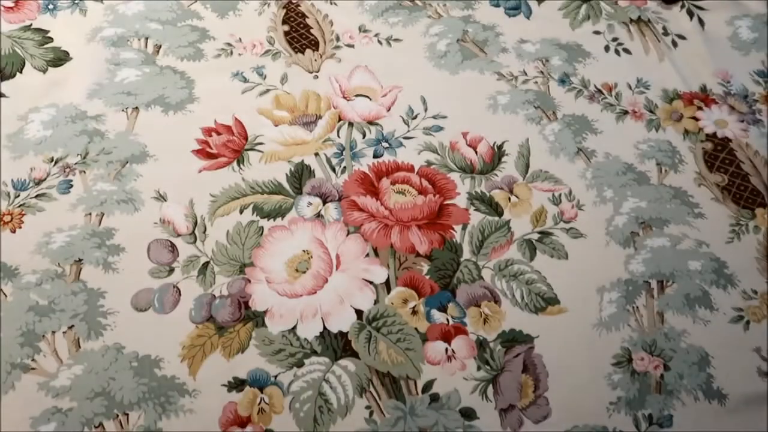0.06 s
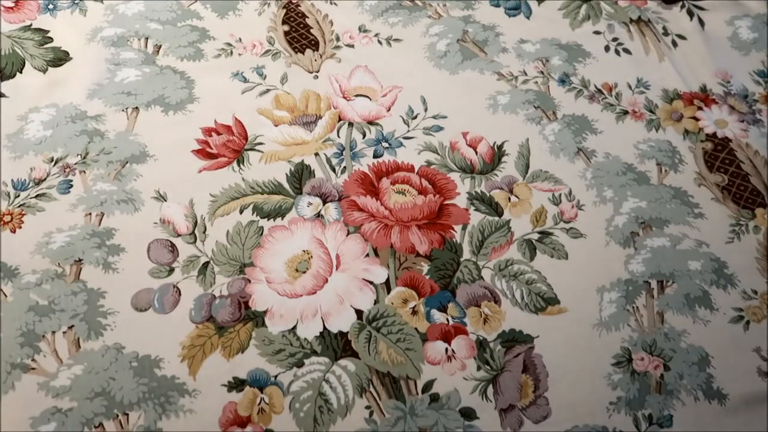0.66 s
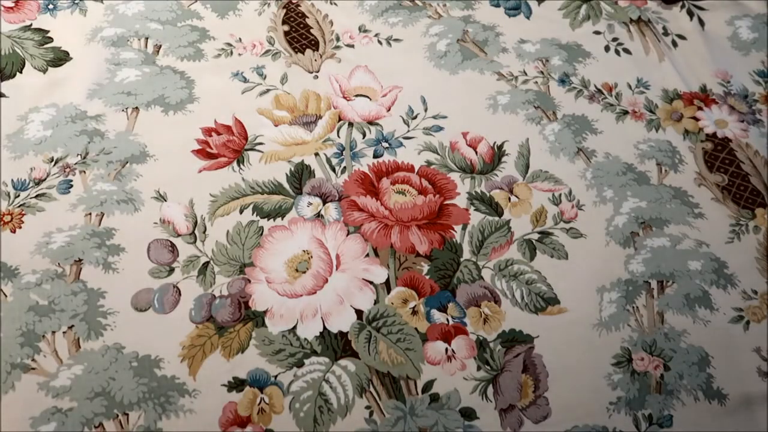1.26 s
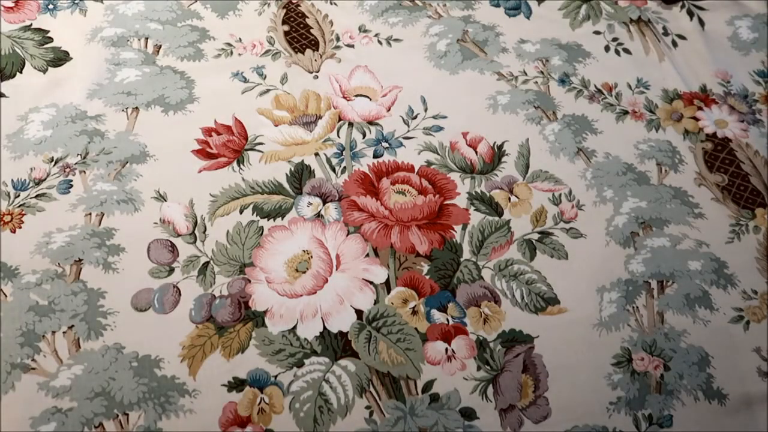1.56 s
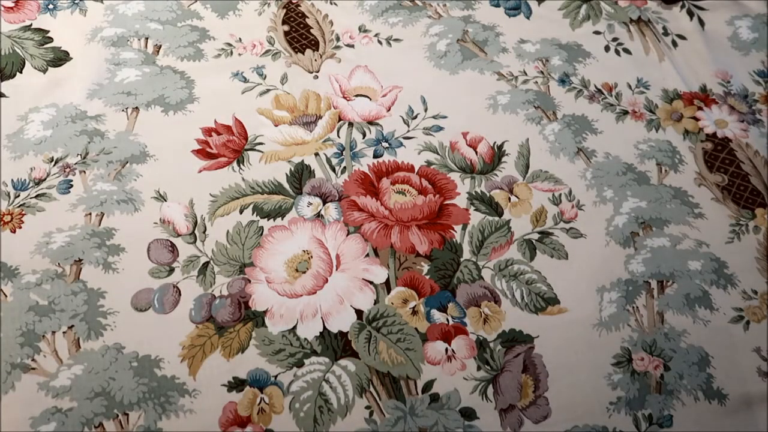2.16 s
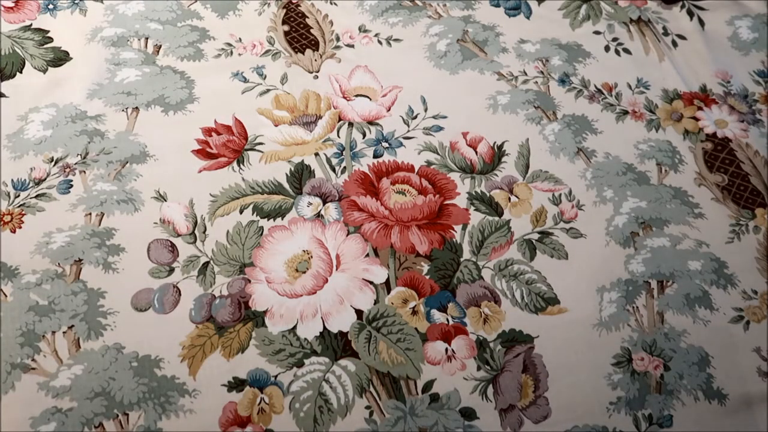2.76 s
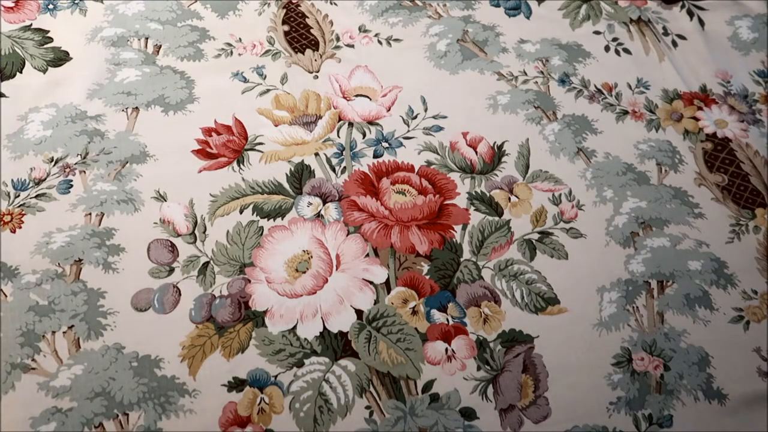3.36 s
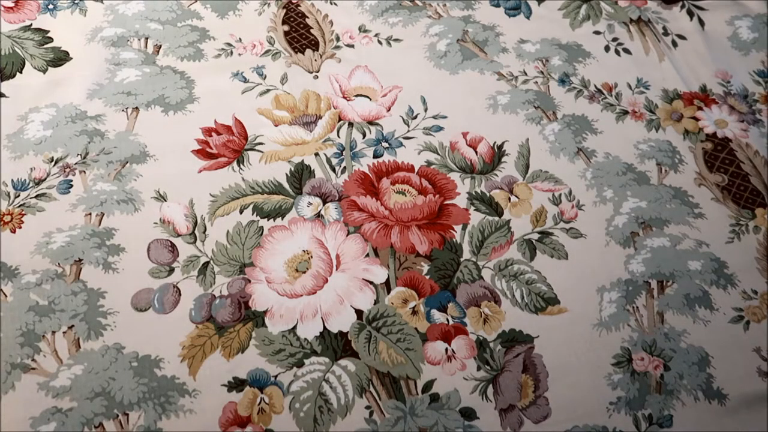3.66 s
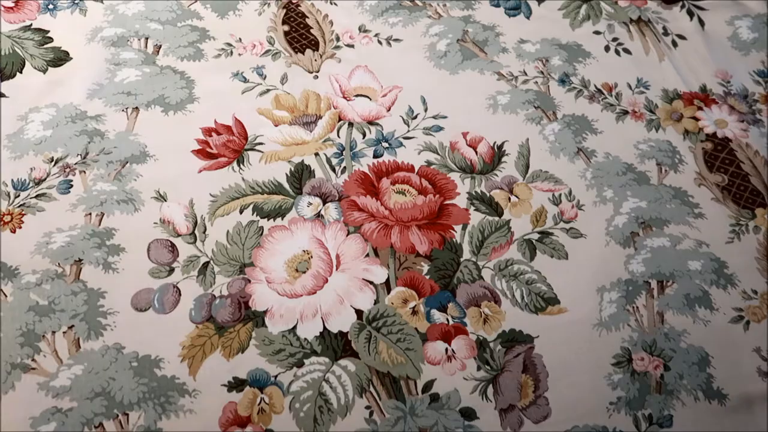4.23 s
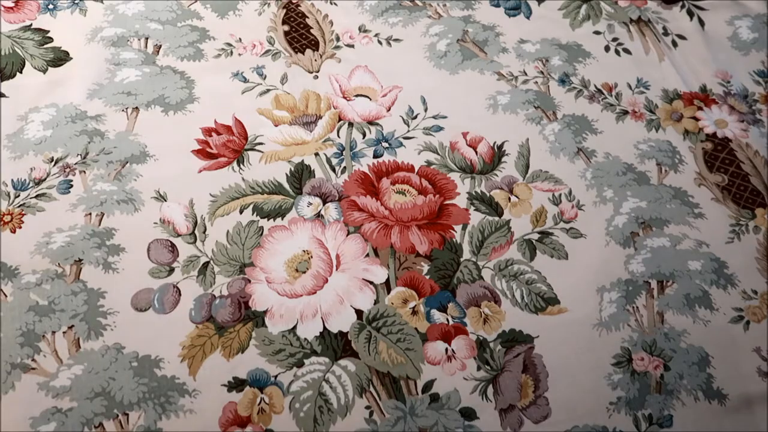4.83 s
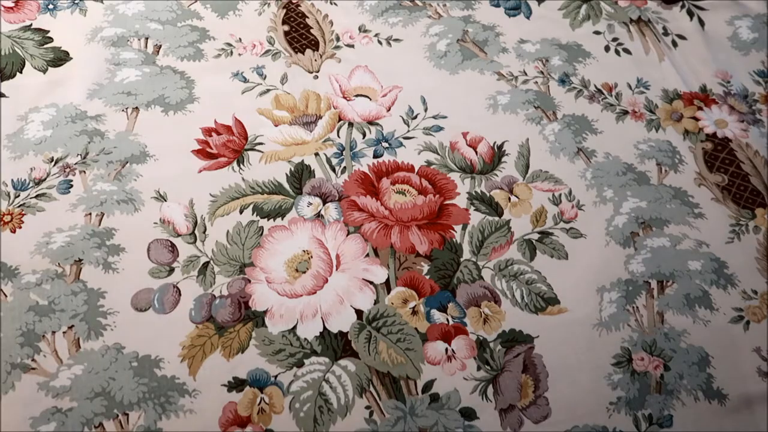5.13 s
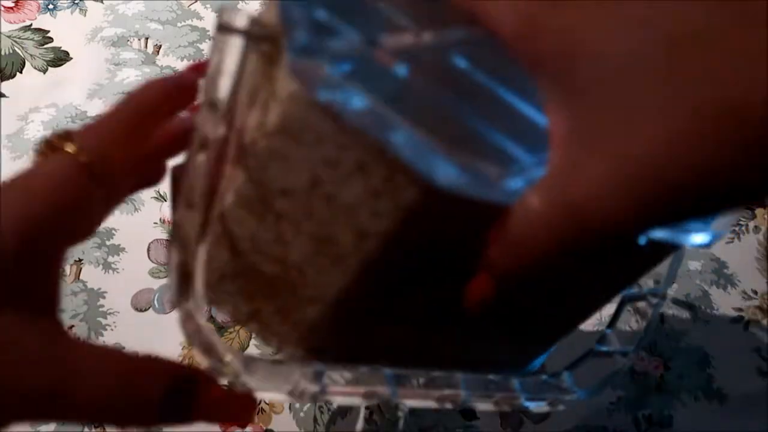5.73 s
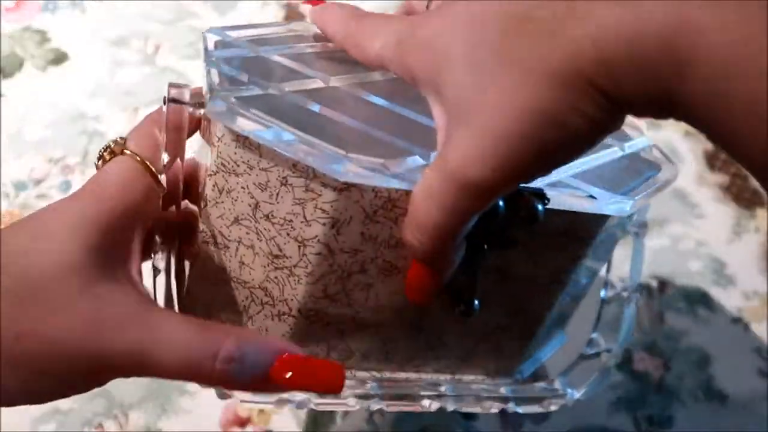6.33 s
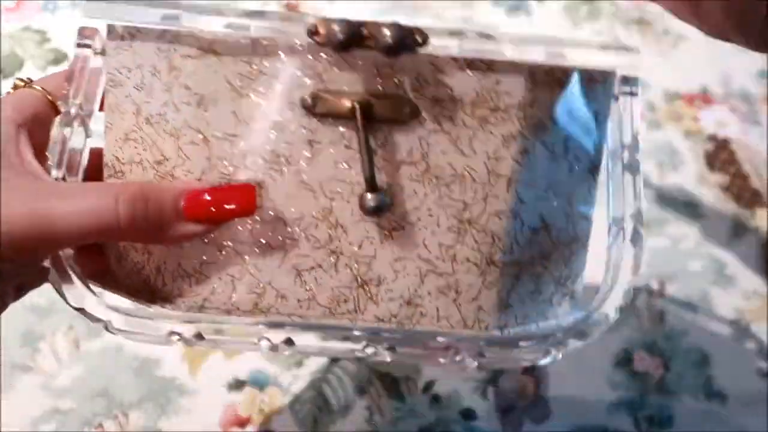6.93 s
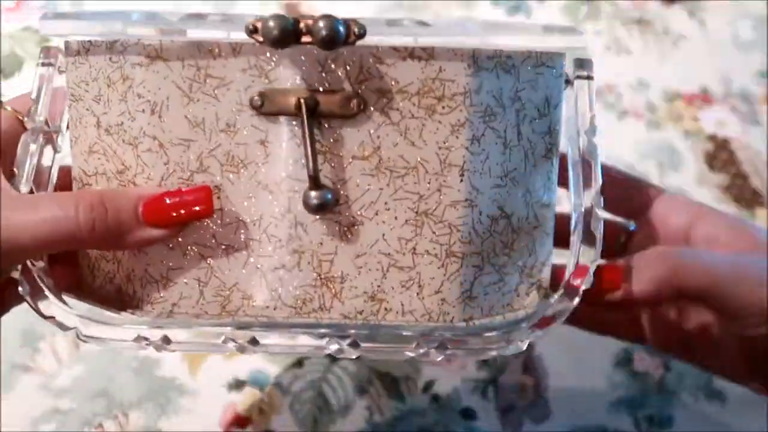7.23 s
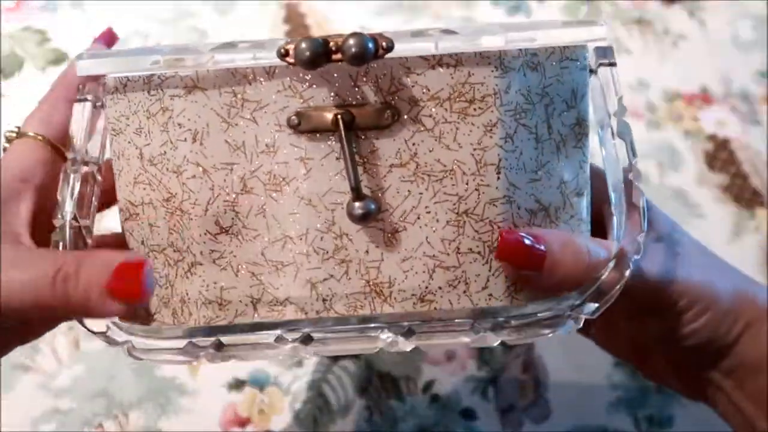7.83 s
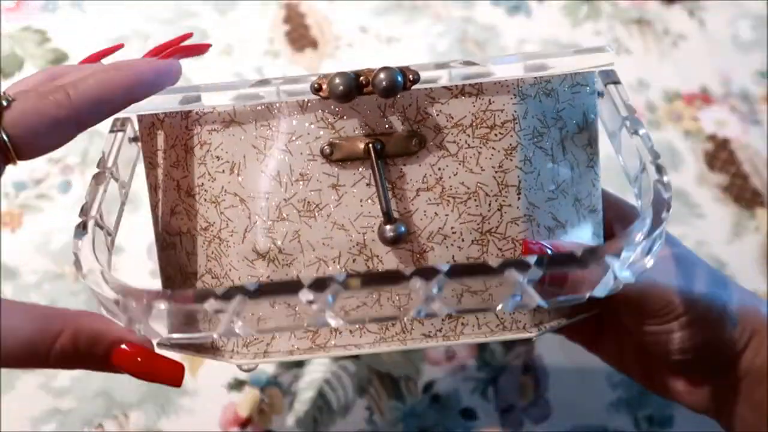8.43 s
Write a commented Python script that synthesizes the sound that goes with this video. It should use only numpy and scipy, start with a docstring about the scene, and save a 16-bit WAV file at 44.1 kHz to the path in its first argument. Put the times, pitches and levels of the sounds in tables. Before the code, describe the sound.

A hard plastic box purse is handled in a quiet room, over low room air and a faint electrical hum. At first it is about half a metre from the stereo microphone, knocking on a table with a short room echo. Hollow clacks come at about 0.4 and 0.9 seconds, with soft sliding between. A light knock at 1.6 leads to a quick clatter, loudest near 2.3 seconds. More knocks follow around 2.9 and 3.2, then faint slides and a few duller bumps near 4.7. After a pause, the purse is turned in the hands close to the microphone and sounds drier. From 5.7 to 6.1 seconds the loose handle raps on the hollow shell amid small clicks. Lighter taps and soft hand rubbing follow, with clasp and fingernail clicks near 6.5 and 7.4, and a quick run of light taps from 7.8 to 8 seconds.

```python
"""A hard plastic box purse, handled in front of a stereo microphone in a quiet room.
First it is knocked about and slid on a table some half a metre off, and the room answers each blow.
Then it is turned in the hands about 20 cm from the microphone: the loose handle raps on the hollow
shell, clasp and fingernails click, hands rub. Each contact is a brief crack plus the ringing of the
body's modes. Room air and a faint mains hum lie underneath."""
import sys
import numpy as np
from scipy import signal
from scipy.fft import rfft, irfft
from scipy.io import wavfile
from scipy.ndimage import uniform_filter1d

SR = 44100
rng = np.random.default_rng(int(sys.argv[2]) if len(sys.argv) > 2 else 0)


def digitize_waveform(pressure):
    """Quantize a signal to 16-bit integers and store it at the path in sys.argv[1].

    Rows of a 2-D input are taken as channels; values are limited to [-1, 1].
    """
    field = np.atleast_2d(pressure).T
    bounded = np.clip(field, -1, 1)
    quanta = np.round(bounded * 32767).astype(np.int16)
    wavfile.write(sys.argv[1], SR, quanta)


N = 374409

# Spectrum of the room's air. Each row: frequency in Hz, relative density in dB.
AIR_SPECTRUM = [(13, -51.5), (22, -24), (59, 0), (92, -13), (124, -5.5), (146, -13), (187, -4), (382, -11),
                (438, -10.5), (502, -17.5), (698, -17), (779, -19), (6100, -33.5), (13500, -44.5),
                (15500, -50)]
# Stereo image of the air. Each row: frequency in Hz, left-right correlation.
AIR_LIKENESS = [(60, 1), (130, 0.97), (290, 0.8), (640, 0.36), (1410, 0.056), (3100, 0.0066), (6820, -0.24),
                (15000, -0.051)]
# Lines of the mains hum. Each row: frequency in Hz, level in dB.
HUM_LINES = [(59.3, -60), (118.6, -59.5), (177.9, -78.5), (441, -65.5), (1583, -75)]
# Decay of the room. Each row: frequency in Hz, seconds to fall 60 dB (t60).
ROOM_T60 = [(150, 0.36), (500, 0.27), (1400, 0.38), (4000, 0.31), (8000, 0.3), (14000, 0.26)]
# Stereo image of the reflections. Each row: frequency in Hz, left-right correlation.
ROOM_LIKENESS = [(150, 0.98), (700, 1), (1500, 1), (3000, 0.9), (7000, 0.68), (14000, 0.13)]
# Where the purse is. Each row: time in seconds, midrange left minus right in dB, distance in metres.
PURSE_PATH = [(0.3, 1.5, 0.55), (3.2, 2, 0.48), (4.7, -5.5, 0.4), (4.9, 5, 0.026), (5.7, 0.63, 0.2),
              (8.4, 0.1, .22)]
# Borders in Hz of a contact's four registers: thump, knock, clack and tick.
REGISTER_EDGES_HZ = [130, 420, 1500, 4500, 14000]

# Blows on the table. Each row: start in seconds, strike in dB, hardness in dB per octave, thump in dB,
# room send in dB (less when the struck wall faces the microphone), then three resonances of the
# struck spot, each as frequency in Hz and lift in dB.
TABLE_KNOCKS = [(0.3487, -26, -5, -34, 0, 746, 11, 2780, 9, 3320, 8),
                (0.3522, -21.5, -5, -27.5, 0, 288, 5.1, 528, 18.5, 1340, 10),
                (0.444, -36, -8, -47, -4, 475, 12, 900, 8, 1300, 2),
                (0.501, -30.5, -6, -38, 0, 540, 15.7, 1100, 7, 2320, 6),
                (0.9134, -27, -2, -42, 4.5, 1370, 3, 2800, 7, 4490, 7),
                (0.9166, -24, -3.5, -29.5, -6, 556, 17, 1140, 10, 5300, 6),
                (0.9212, -31.5, -3.5, -29.5, -6, 430, 7.8, 900, 11, 1710, 3),
                (0.9391, -36.5, -2, -55, -7, 1120, 5, 3085, 6, 5400, 9),
                (0.985, -37.5, -8, -39, -0.5, 542, 29, 865, -2, 1120, -1),
                (1.6491, -36, -6.5, -46.5, 4, 550, 8.5, 710, 4, 2240, 0),
                (2.0536, -33, -4.5, -37, 3.5, 829, 6, 1380, 5, 1920, 13),
                (2.081, -35.5, -1.7, -40, 1.5, 1110, 28, 4300, 9, 5870, 13),
                (2.098, -51.5, 2, -53.5, 10, 2210, 4, 4400, 18, 6930, 14),
                (2.124, -37, -4, -35.5, 1.5, 756, 6.1, 1880, 18.5, 4350, 15.5),
                (2.23, -31.5, -5, -34, 4.5, 500, 14, 713, 3, 1110, 0),
                (2.239, -20.5, -4, -37.5, 6, 535, 9.3, 1710, 10, 2420, 2),
                (2.2466, -19, -5, -31.5, -1, 518, 16, 1100, 9, 2450, 8),
                (2.27, -13.5, -3.5, -24, -8, 703, 11.4, 1365, 13.5, 1640, 10),
                (2.2765, -25.5, 0.5, -33.5, 10, 717, 19, 2900, -3, 4900, 5),
                (2.2869, -25, -3.5, -37, 2.5, 740, 6, 3900, 3, 7000, -5),
                (2.818, -54, 0.3, -65, 7, 2900, 8.1, 3660, 16, 5400, 8),
                (2.897, -36.5, -7.5, -41, 1.5, 690, 15, 1090, 13.5, 1410, 9),
                (3.1567, -32, -2.5, -35, 3.5, 523, 7.8, 855, 17, 1710, 11.5),
                (3.163, -26, -10, -27, -4, 255, 17, 640, 16, 1240, 16),
                (3.169, -30, -12, -35, -3.5, 283, 4, 544, 12, 637, 24),
                (4.668, -42.5, -10, -43, 11, 270, 6.3, 556, 15, 720, 24),
                (4.697, -47.5, -18, -32.5, -5, 283, 23, 560, 3, 705, 14),
                (4.7993, -30.5, -9.5, -49, 7.5, 476, 7.9, 720, -1, 1230, 1),
                (4.8232, -28.5, -9.5, -31, 6, 213, 13.5, 577, 14, 766, 20)]
# Modes of the purse on the table. Each row: frequency in Hz, relative level in dB, t60 in seconds.
TABLE_MODES = [(220, 3, 0.015), (277.5, 2, 0.046), (461, -1, 0.038), (520, 0, 0.065), (691, 4.5, 0.032),
               (820, -9, 0.092), (1020, -10, 0.048), (1130, -2.5, 0.042), (1340, 6, 0.018),
               (2240, -2.5, 0.039), (2900, -10, 0.061), (3100, -3, 0.038), (3450, -1.5, 0.029),
               (4430, -8.5, 0.031), (5400, -7.5, 0.022), (6930, -5.5, 0.035), (7620, -8.5, .03)]
# Hands and purse sliding, and soft finger thuds on the shell (the rows near 280 Hz after 5.8 s). Each row:
# start in seconds, length in seconds, centre in Hz, level in dB.
RUB_STROKES = [(0.609, 0.11, 375, -46.5), (0.717, 0.056, 282, -46), (0.771, 0.068, 565, -45.5),
               (0.862, 0.061, 646, -45.5), (2.077, 0.053, 4390, -46.5), (2.161, 0.087, 560, -47),
               (2.989, 0.28, 990, -51.5), (3.428, 0.16, 990, -55.5), (4.009, 0.061, 384, -46.5),
               (5.626, 0.076, 2750, -55.5), (5.865, 0.055, 290, -42.5), (6.042, 0.07, 2900, -55),
               (6.165, 0.068, 262, -48), (6.794, 0.033, 1700, -59), (6.806, 0.054, 300, -48.5),
               (6.906, 0.021, 2600, -59), (7.005, 0.14, 290, -52), (7.127, 0.047, 1390, -59),
               (7.798, 0.13, 1980, -63)]
# Handle and fingers on the shell. Each row: start in seconds, strike in dB, hardness in dB per octave,
# thump in dB, then two resonances of the struck spot, each as frequency in Hz and lift in dB.
SHELL_RAPS = [(5.7559, -37, -8, -48.5, 620, 7.1, 970, 6.8), (5.904, -40.5, -22, -48, 454, 4.1, 1040, 12),
              (6.0089, -26, -7, -35, 1060, 8.9, 2900, 3.5), (6.0436, -27, -7, -27.5, 380, 13, 810, 9),
              (6.0733, -28.5, -9, -31, 1055, 13, 1820, 9.3), (6.09, -35.5, -11, -43, 287, 3.5, 810, 5.1),
              (6.783, -53, -10, -39, 220, 6.3, 420, 2), (6.8033, -45.5, -7, -38.5, 1000, 7, 2110, 6.2),
              (6.958, -43, -7.5, -38.5, 950, 17, 2040, 10), (6.997, -62, -4, -39, 285, 3.4, 1000, 2),
              (7.1291, -51, -6.5, -52, 1020, 13, 1590, 6.3), (7.283, -45.5, -6, -40, 950, 20, 1560, 5.1),
              (7.598, -44, -7, -38.5, 976, 17, 1620, 3.9), (7.629, -52, -14, -42, 1020, 11, 1672, 5),
              (7.809, -58, -10, -47, 638, 4, 920, 7), (7.833, -50.5, -5.5, -45, 1850, 16, 3280, 20),
              (7.878, -50.5, -5.5, -39, 429, 9, 1700, 8.6), (7.921, -45, -7, -40.5, 1000, 5.6, 1650, 14),
              (7.944, -43, -7.5, -40, 990, 5.3, 1665, 10), (7.987, -43, -8, -43, 1020, 12, 1660, 14),
              (8.036, -44, -6.5, -40, 970, 8.6, 1665, 8.5)]
# Modes of the hand-held shell. Each row: frequency in Hz, relative level in dB, t60 in seconds.
SHELL_MODES = [(238, -1, 0.15), (290, 2, 0.11), (430, 2, 0.029), (784, -5, 0.053), (906, 0.5, 0.013),
               (1030, -1, 0.026), (1237, -11, 0.066), (1400, -2, 0.024), (1640, 1, 0.037), (1890, 0, 0.031),
               (2076, -11, 0.091), (2332, -14.5, 0.087), (2830, -5.5, 0.026), (3280, -8.5, 0.021),
               (3780, -11, .018), (4900, -5, 0.014)]
# Clasp and fingernail contacts. Each row reads as in SHELL_RAPS.
CLASP_CLICKS = [(5.845, -47, -1, -43, 2706, 9.9, 9700, 15), (5.8663, -59, 3, -63, 7600, 5.2, 11200, 25),
                (5.874, -47.5, 1, -42, 4550, 14, 5150, 5.5), (6.165, -74.5, 4.5, -46, 11300, 8, 12000, 24),
                (6.465, -47.5, 0.1, -38.5, 1900, 8.3, 5370, 6.7),
                (7.4085, -44, -0.3, -42, 2970, 9.3, 4070, 15),
                (7.4453, -38.5, 0, -46, 1650, 5.7, 2930, 9.7), (7.4498, -42, -2, -51, 476, 14, 1960, 27),
                (7.512, -67, -1.5, -46, 3200, 4, 4300, 8)]
# Modes rung by the clasp. Each row: frequency in Hz, relative level in dB, t60 in seconds.
CLASP_MODES = [(270, -1, 0.08), (468, -2, 0.093), (810, -7, 0.027), (1020, 10.5, 0.014), (1650, 6, 0.016),
               (2067, 3, 0.041), (2720, -5, 0.045), (3320, 5.5, 0.028), (3900, -2, 0.021), (4160, 7, 0.017),
               (4550, 5.5, 0.023), (5150, 9, 0.014), (5350, 0, .017), (7570, 9.5, 0.0082),
               (11000, -22, 0.018)]

RING_TIME = np.arange(20480) / SR  # seconds since a contact
ATTACK_SAMPLES = int(.02 * SR)
REGISTER_CENTRES_HZ = np.sqrt(np.multiply(REGISTER_EDGES_HZ[1:], REGISTER_EDGES_HZ[:-1]))
ROOM_RADIUS_M = 0.34  # here the room is as loud as the direct sound, for a send of 0 dB


def from_db(db):
    """Decibels to gain."""
    return 10 ** (np.asarray(db) / 20)


def unit_power(x):
    """Scale to an RMS of one."""
    return x / np.sqrt(np.mean(x ** 2) + 1e-20)


def bin_hz(size):
    """Frequencies of a spectrum's bins, from 1 Hz up."""
    return np.maximum(np.arange(size // 2 + 1) * SR / size, 1)


def at_hz(table, hz):
    """Read a table on a log-frequency axis."""
    table_hz, values = np.transpose(table)
    return np.interp(np.log(hz), np.log(table_hz), values)


def band(x, low_hz, high_hz):
    """Causal band-pass."""
    return signal.sosfilt(signal.butter(2, [low_hz, high_hz], "band", fs=SR, output="sos"), x)


def low_pass(x, hz, order):
    """Causal treble cut."""
    return signal.sosfilt(signal.butter(order, hz, fs=SR, output="sos"), x)


def equalised(sound, gain):
    """Apply a gain per frequency with minimum phase, so nothing sounds early."""
    size = sound.shape[1]
    cepstrum = irfft(np.log(gain))
    cepstrum[1:size // 2] *= 2
    return irfft(rfft(sound) * np.exp(rfft(cepstrum[:size // 2], size)))


def resonance(x, hz, decay_per_s):
    """One damped resonance with a gain of one at its peak."""
    r = np.exp(-decay_per_s / SR)
    poles = [1, -2 * r * np.cos(2 * np.pi * hz / SR), r * r]
    return (1 - r * r) / 2 * signal.lfilter([1, 0, -1], poles, x)


def add(out, start_s, sound):
    """Mix a stereo sound in."""
    start = round(start_s * SR)
    out[:, start:start + sound.shape[1]] += sound[:, :N - start]


def stereo_noise(likeness, size):
    """White noise whose two sides are as alike as the table says."""
    alike = at_hz(likeness, bin_hz(size))
    mid, side = rfft(rng.standard_normal((2, size)))
    return irfft(np.sqrt((1 + alike) / 2) * mid + np.sqrt((1 - alike) / 2) * side * [[1], [-1]], size)


def room_air(level_db):
    """Steady room tone, mostly bass, wider in the treble."""
    spectrum = rfft(stereo_noise(AIR_LIKENESS, N)) * from_db(at_hz(AIR_SPECTRUM, bin_hz(N)))
    return from_db(level_db) * low_pass(unit_power(irfft(spectrum, N)), 13500, order=6)


def mains_hum(waver_rad):
    """A faint hum in the centre; each line wavers slowly in phase."""
    t = np.arange(N) / SR
    knots = np.linspace(0, t[-1], 40)
    hum = np.zeros(N)
    for hz, db in HUM_LINES:
        waver = waver_rad * np.interp(t, knots, rng.standard_normal(len(knots)))
        hum += np.sqrt(2) * from_db(db) * np.sin(2 * np.pi * hz * t + waver)
    return hum


def room_tails(places):
    """Dense reflections of unit energy from several places; each octave dies at its own pace."""
    noise = stereo_noise(ROOM_LIKENESS, places * len(RING_TIME)).reshape(2, places, -1)
    edges_hz = np.geomspace(90, 18000, 9)
    tails = np.zeros_like(noise)
    for k, (low, high) in enumerate(zip(edges_hz, edges_hz[1:])):
        t60 = at_hz(ROOM_T60, np.sqrt(low * high))
        tails += (-1) ** k * band(noise, low, high) * from_db(-60 * RING_TIME / t60)
    return unit_power(tails.swapaxes(0, 1)) / np.sqrt(len(RING_TIME))


def in_room(sound, start_s, room, wet_db, build_s):
    """The direct sound, then reflections building up behind it; the room favours no pitch of its own."""
    tail = room[int(start_s / .5) % len(room)]  # each half second has its own place
    response = from_db(wet_db) * tail * (1 - np.exp(-(RING_TIME / build_s) ** 2))
    response[:, 0] += 1  # direct path
    power = np.mean(np.abs(rfft(response)) ** 2, axis=0)
    flattening = np.sqrt(uniform_filter1d(power, size=410) / uniform_filter1d(power, size=41))
    return signal.fftconvolve(sound[None], equalised(response, flattening), axes=1)


def spread_click(stages, t60):
    """The walls bend, so each pitch of a click leaves at its own moment; the spectrum stays even."""
    r = from_db(-60 / (t60 * SR))
    cosines = np.cos(2 * np.pi * rng.uniform(300, 13000, stages) / SR)
    all_passes = [[r * r, -2 * r * c, 1, 1, -2 * r * c, r * r] for c in cosines]
    return signal.sosfilt(all_passes, signal.unit_impulse(4096) + 1e-18)


def strike(modes, click, crack_db, crack_hz, vary_db):
    """One contact: the body's modes ring behind the brief crack of the impact."""
    hz, db, t60 = np.transpose(modes)
    t = RING_TIME[:len(click)]
    strength = from_db(db + vary_db * rng.standard_normal(len(hz))) * rng.choice([-1, 1], len(hz))
    ring = strength @ (np.sin(2 * np.pi * np.outer(hz, t)) * from_db(-60 * np.outer(1 / t60, t)))
    crack = from_db(crack_db) * signal.lfilter(*signal.butter(1, crack_hz, fs=SR), click)
    return band(ring + crack, 228, 12000)  # a small body radiates little bass


def spot_ring(sound, spot, cycles, lift_share):
    """The struck spot's resonances colour the blow and fall 60 dB in the given cycles."""
    for hz, lift_db in np.reshape(spot, (-1, 2)):
        ring = resonance(sound, hz, decay_per_s=np.log(1000) * hz / cycles)
        sound = sound + (from_db(lift_share * lift_db) - 1) * ring
    return sound


def radiated(sound, start_s, spot, room, spot_cycles, room_db, build_s):
    """The farther off the purse, the more room; the struck spot beams its ring at the microphone."""
    times, _, distance_m = np.transpose(PURSE_PATH)
    wet_db = room_db + 20 * np.log10(np.interp(start_s, times, distance_m) / ROOM_RADIUS_M)
    off_axis = spot_ring(sound, spot, spot_cycles, lift_share=0.7)
    on_axis = spot_ring(sound, spot, spot_cycles, lift_share=1)
    heard = in_room(off_axis, start_s, room, wet_db, build_s)
    heard[:, :len(sound)] += on_axis - off_axis
    return heard


def voiced(sound, strike_db, hardness, thump_db, clack_db):
    """Set the attack's registers: weight gives the thump, hardness the slope, plastic the extra clack."""
    octaves = np.log2(REGISTER_CENTRES_HZ / REGISTER_CENTRES_HZ[1])
    _, knock, clack, tick = strike_db + hardness * octaves
    wanted_db = np.array([thump_db, knock, clack + clack_db, tick])
    sound = sound[:, :len(RING_TIME)]
    window = np.interp(np.arange(2 * ATTACK_SAMPLES) / ATTACK_SAMPLES, [.8, 1.2], [1, 0])
    edge_bins = np.array(REGISTER_EDGES_HZ) * len(window) // SR
    for _ in range(2):  # twice, as neighbouring registers overlap
        attack = sound[:, :len(window)] * window
        power = np.mean(np.abs(rfft(attack)) ** 2, axis=0) / ATTACK_SAMPLES ** 2
        attack_db = 10 * np.log10(np.add.reduceat(power, edge_bins)[:-1])
        boosts = np.column_stack([REGISTER_CENTRES_HZ, wanted_db - attack_db])
        sound = equalised(sound, from_db(at_hz(boosts, bin_hz(len(RING_TIME)))))
    return sound


def at_microphone(sound, start_s, lag_s_per_db=27e-6):
    """The housing shades the far port's midrange; the near port hears it louder, and sooner."""
    times, pans_db, _ = np.transpose(PURSE_PATH)
    pan_db = np.interp(start_s, times, pans_db)
    midrange = signal.lfilter(*signal.butter(1, (500, 5000), "band", fs=SR), sound)
    ports = []
    for port, mids, side_db in zip(sound, midrange, (pan_db, -pan_db)):
        lag = round(max(-side_db, 0) * lag_s_per_db * SR)
        ports.append(np.roll(port + (from_db(side_db / 2) - 1) * mids, lag))
    return np.array(ports)


def table_knocks(room):
    """The purse hits the table some way from the microphone, and the room answers."""
    out = np.zeros((2, N))
    for start_s, strike_db, hardness, thump_db, room_db, *spot in TABLE_KNOCKS:
        click = spread_click(stages=20, t60=0.0078)
        blow = strike(TABLE_MODES, click, crack_db=42.5, crack_hz=1950, vary_db=3.0)
        heard = radiated(blow, start_s, spot, room, spot_cycles=32, room_db=room_db, build_s=0.0028)
        heard = voiced(heard, strike_db, hardness, thump_db, clack_db=1.5)
        add(out, start_s, at_microphone(heard, start_s))
    return low_pass(out, 13300, order=8)  # the knocks' treble is cut steeply above 13.3 kHz


def rubs(room, grain_db, speed_rise):
    """Tiny uneven slips excite one broad resonance while the stroke swells and fades."""
    out = np.zeros((2, N))
    for start_s, length_s, hz, db in RUB_STROKES:
        size = int(length_s * SR)
        slips = rng.standard_normal(size) * from_db(grain_db * rng.standard_normal(size))
        width_hz = 380 * (hz / 1000) ** 1.57  # a brighter rub is also broader
        friction = resonance(slips, hz, decay_per_s=np.pi * width_hz)
        progress = np.arange(size) / size
        travel = progress + speed_rise * progress * (progress - 1) / 2  # speeding up lifts the pitch
        stroke = unit_power(np.interp(travel, progress, friction)) * np.sin(np.pi * progress)
        add(out, start_s, from_db(db) * in_room(stroke, start_s, room, wet_db=-3.0, build_s=0.0017))
    return out


def shell_raps(room):
    """Handle and fingers rap the hollow shell close to the microphone, with little room."""
    out = np.zeros((2, N))
    for start_s, strike_db, hardness, thump_db, *spot in SHELL_RAPS:
        click = spread_click(stages=10, t60=0.0084)
        rap = strike(SHELL_MODES, click, crack_db=32.5, crack_hz=1300, vary_db=3.5)
        heard = radiated(rap, start_s, spot, room, spot_cycles=44, room_db=-3.5, build_s=0.0011)
        heard = voiced(heard, strike_db, hardness, thump_db, clack_db=6.0)
        add(out, start_s, at_microphone(heard, start_s))
    return out


def clasp_touch():
    """One very short, hard contact with a brief bright ring."""
    click = spread_click(stages=12, t60=0.0024)
    return strike(CLASP_MODES, click, crack_db=38.5, crack_hz=5400, vary_db=3.5)


def clasp_clicks(room, rebound_s=(0.002184, 0.0084), rebound_db=-6):
    """The clasp snaps close to the microphone; the loose part touches again at once."""
    out = np.zeros((2, N))
    for start_s, strike_db, hardness, thump_db, *spot in CLASP_CLICKS:
        lag = int(rng.uniform(*rebound_s) * SR)
        snap = np.pad(clasp_touch(), (0, lag)) + from_db(rebound_db) * np.pad(clasp_touch(), (lag, 0))
        heard = radiated(snap, start_s, spot, room, spot_cycles=25, room_db=-2.0, build_s=0.00073)
        heard = voiced(heard, strike_db, hardness, thump_db, clack_db=3.0)
        add(out, start_s, at_microphone(heard, start_s))
    return out


def gain_control(x, threshold_db, release_db_per_s, attack_s):
    """A blow above the threshold turns the recorder's gain down; it creeps back afterwards."""
    power = uniform_filter1d(np.mean(x ** 2, axis=0), size=ATTACK_SAMPLES)
    over_db = np.maximum(10 * np.log10(np.abs(power) + 1e-12) - threshold_db, 0)
    release_db = release_db_per_s * np.arange(N) / SR
    held_db = np.maximum.accumulate(over_db + release_db) - release_db
    r = np.exp(-1 / (attack_s * SR))
    return x * from_db(-signal.lfilter([1 - r], [1, -r], held_db))


def scene():
    """Purse, hands and room as they reach the microphone."""
    room = room_tails(places=17)
    purse = table_knocks(room) + shell_raps(room) + clasp_clicks(room)
    sliding = rubs(room, grain_db=2.5, speed_rise=0.23)
    return purse + sliding + room_air(level_db=-48.5) + mains_hum(waver_rad=0.062)


def record(dry):
    """The recorder rides its gain, clips the hardest crack and cuts the top above 15.4 kHz."""
    levelled = gain_control(dry, threshold_db=-15.0, release_db_per_s=10.0, attack_s=0.015)
    clipped = np.clip(levelled, -.82, .82)
    return signal.sosfilt(signal.ellip(10, .1, 80, 15400, fs=SR, output="sos"), clipped)


dry = scene()
out = record(dry)
digitize_waveform(out)
```